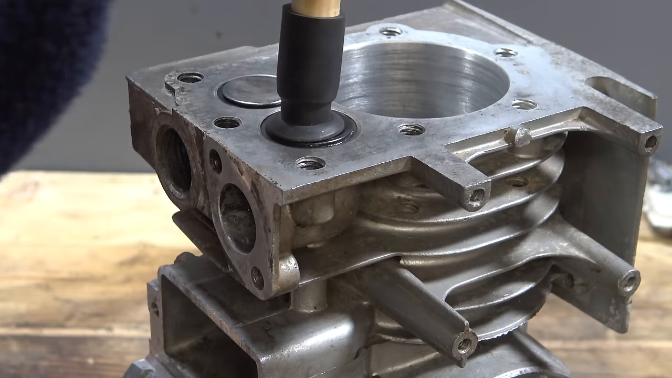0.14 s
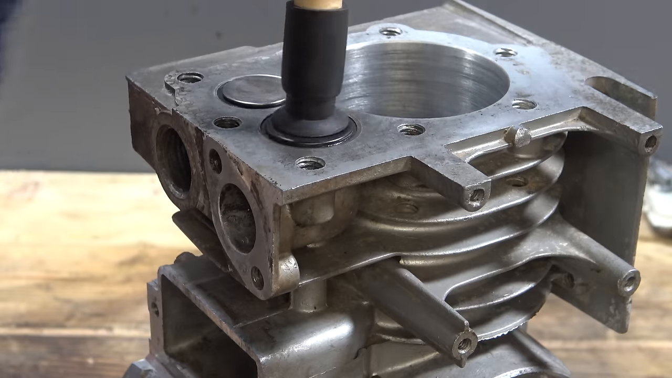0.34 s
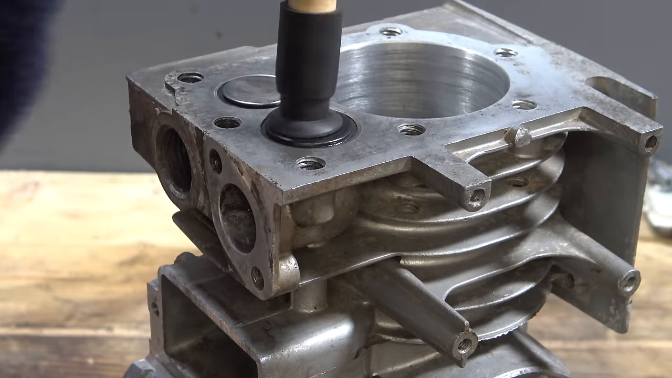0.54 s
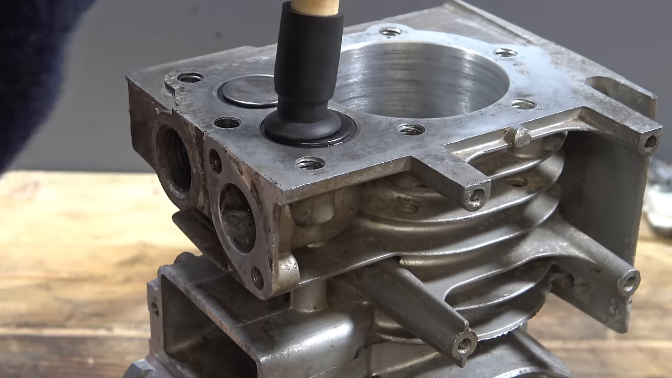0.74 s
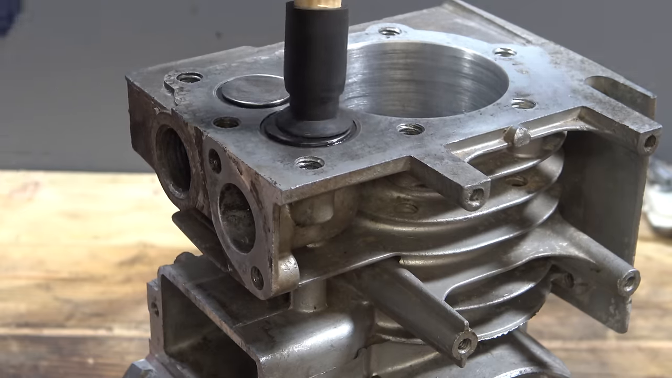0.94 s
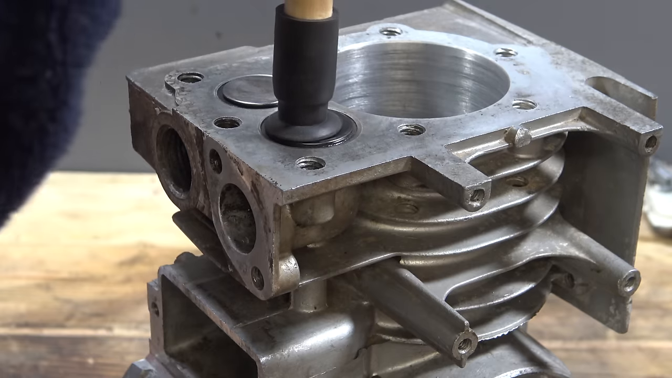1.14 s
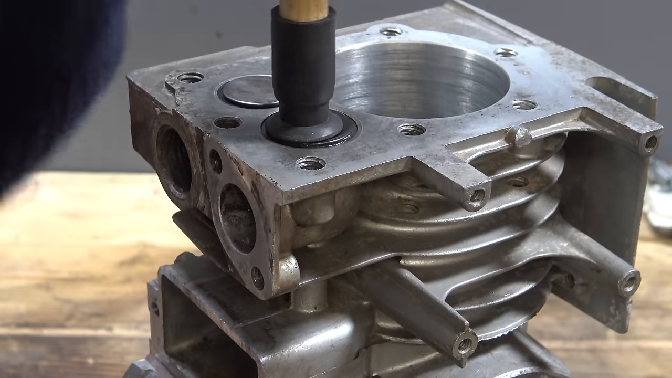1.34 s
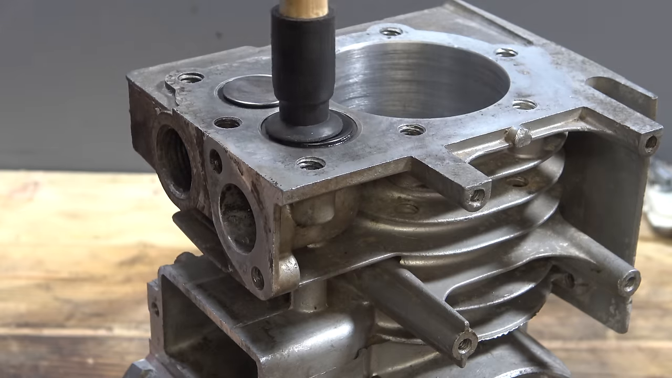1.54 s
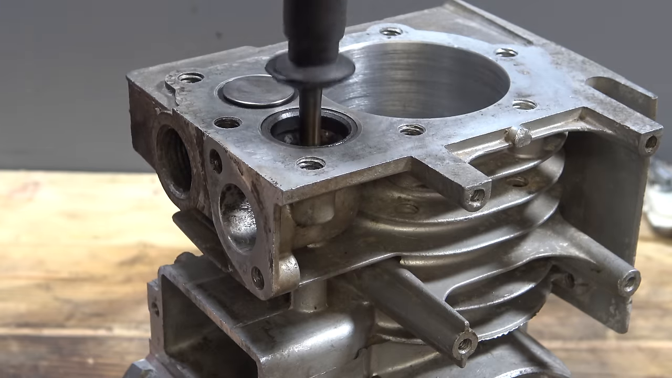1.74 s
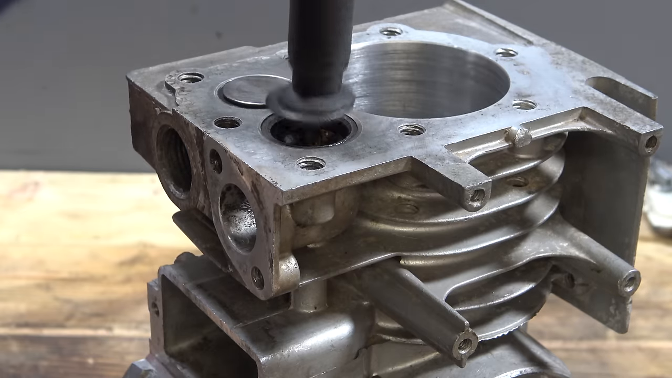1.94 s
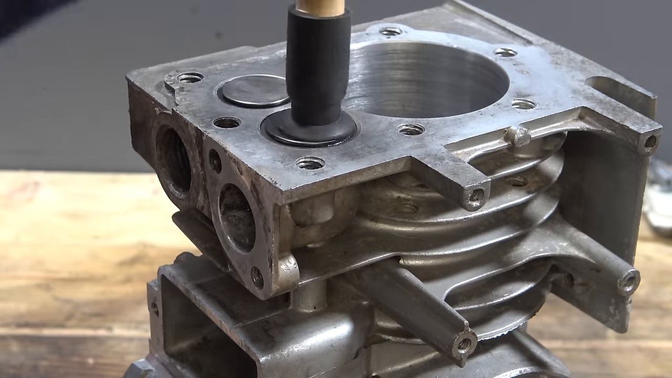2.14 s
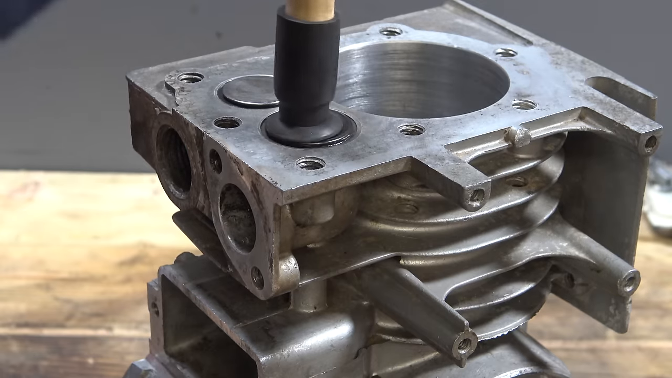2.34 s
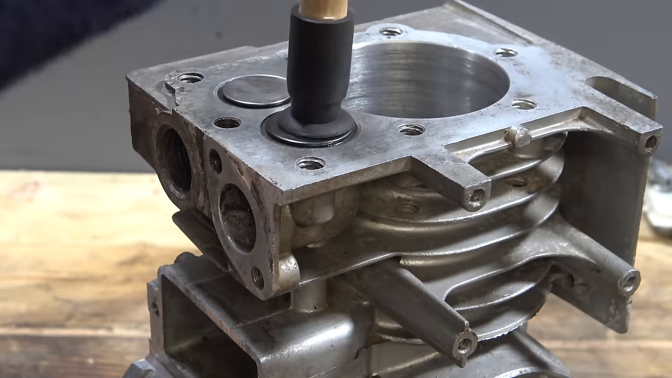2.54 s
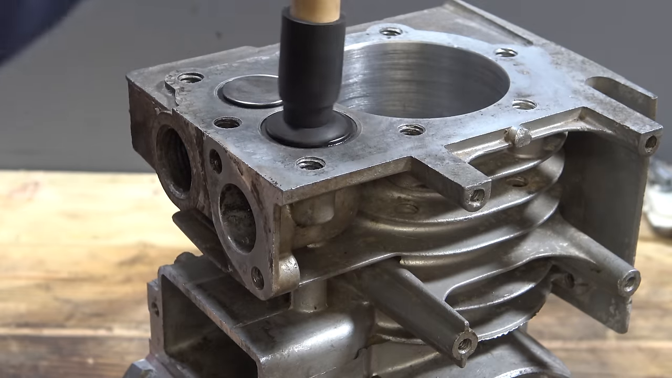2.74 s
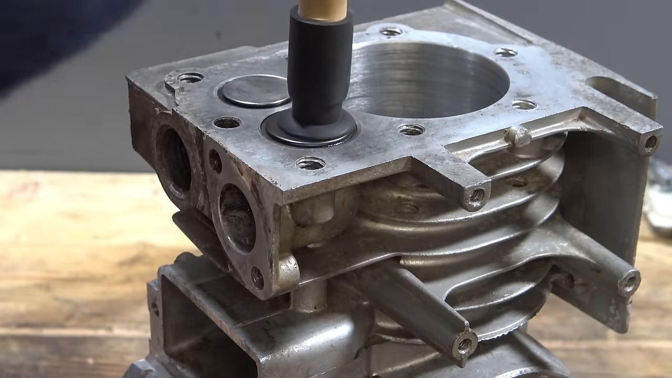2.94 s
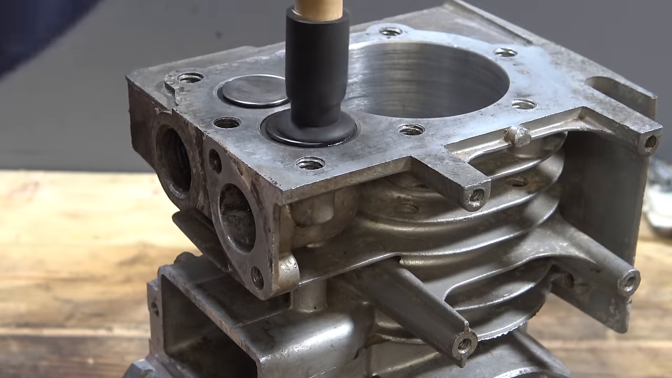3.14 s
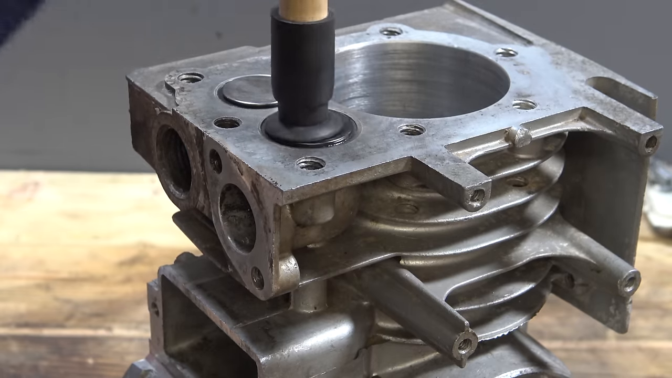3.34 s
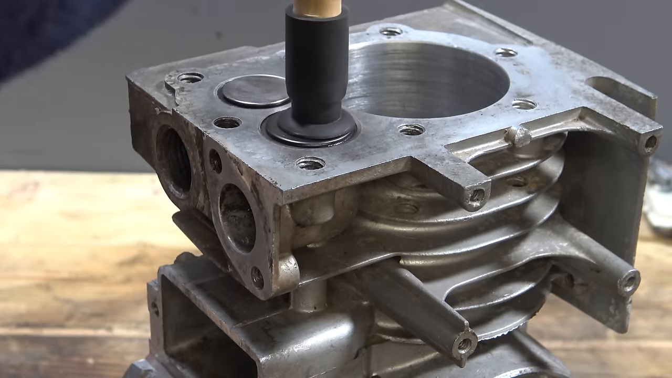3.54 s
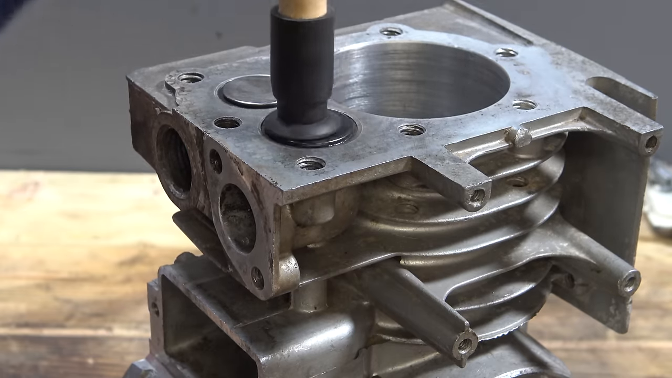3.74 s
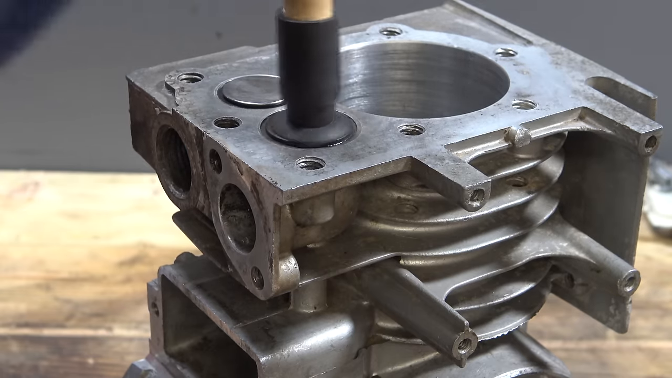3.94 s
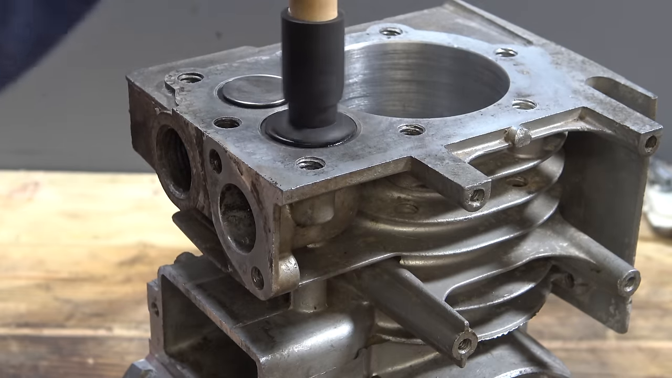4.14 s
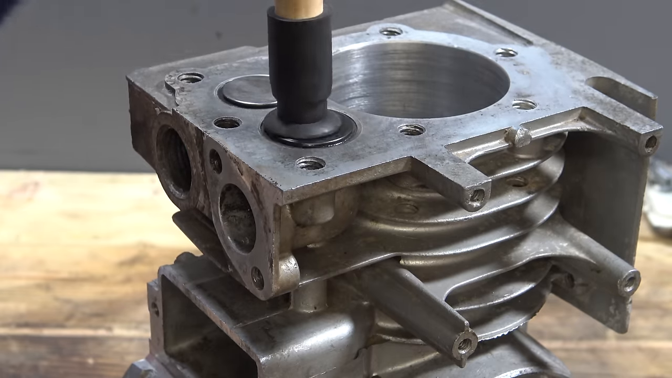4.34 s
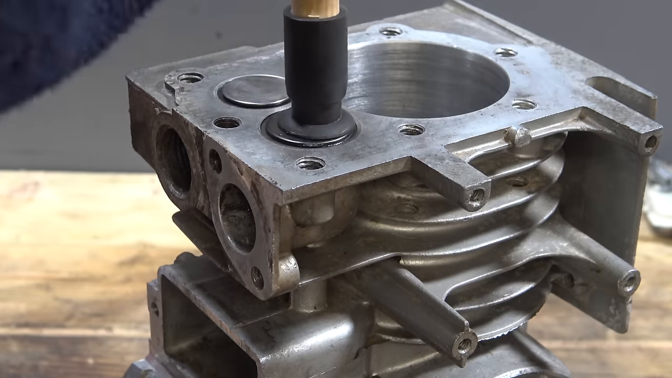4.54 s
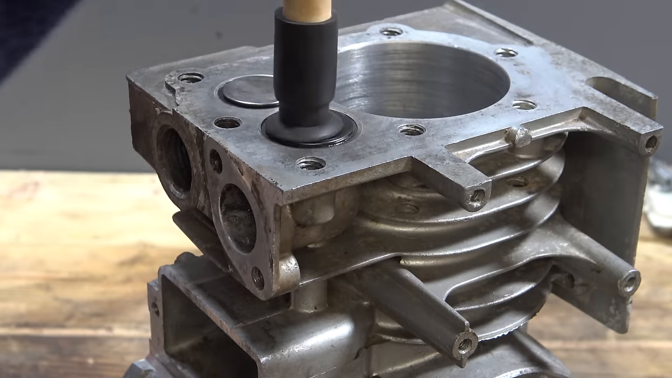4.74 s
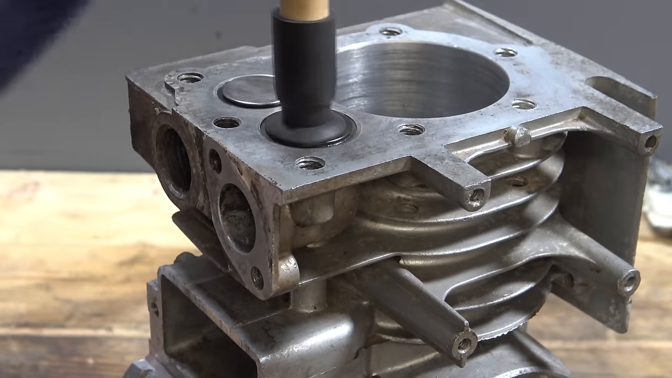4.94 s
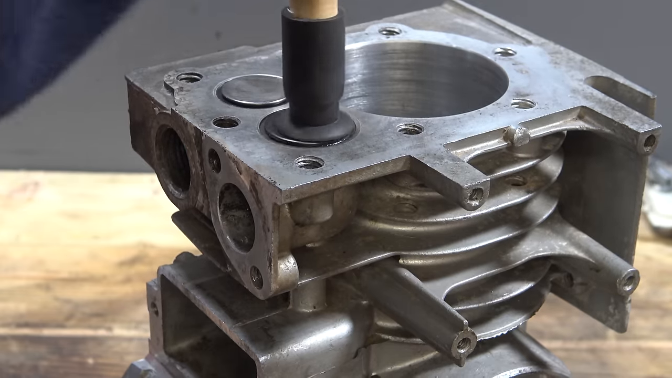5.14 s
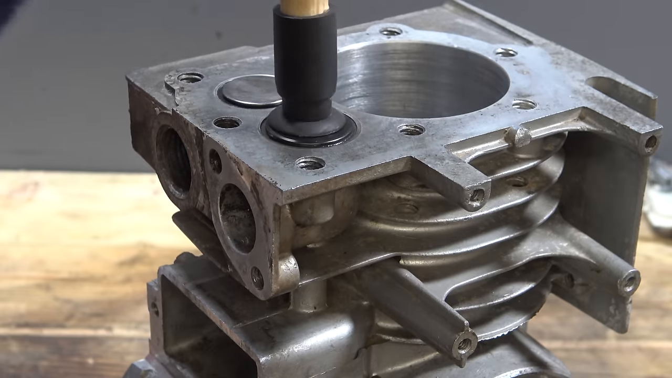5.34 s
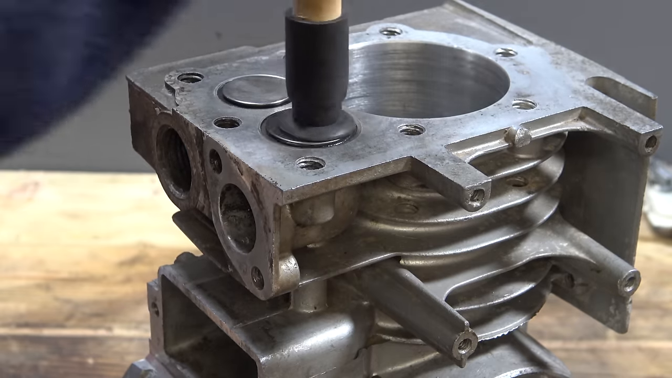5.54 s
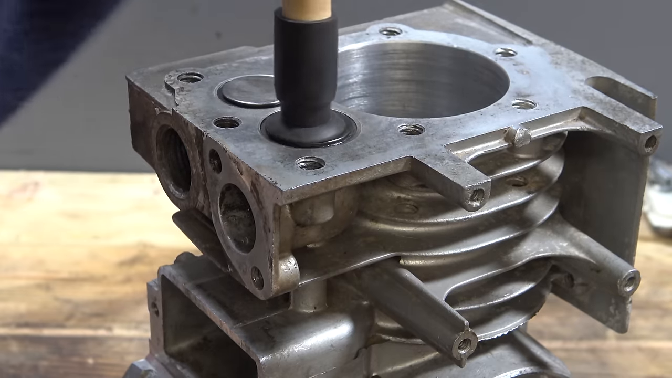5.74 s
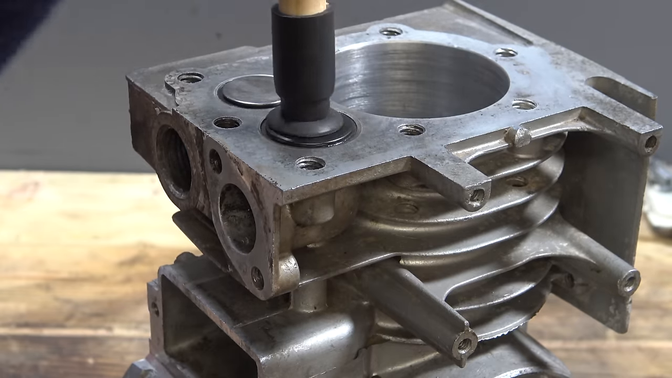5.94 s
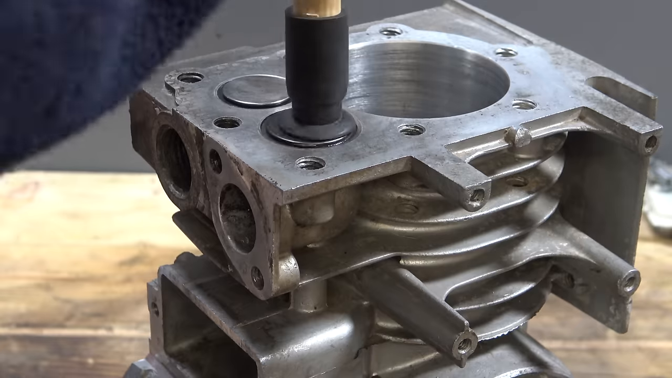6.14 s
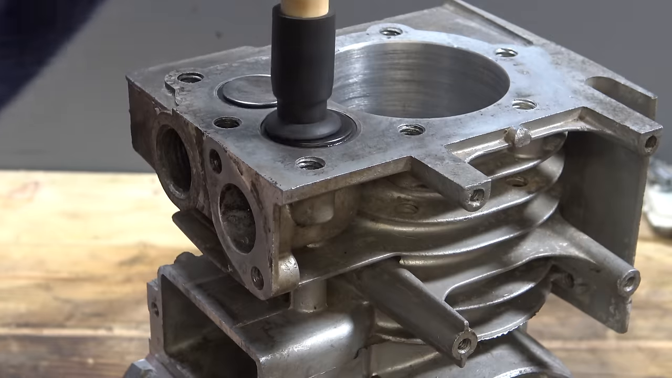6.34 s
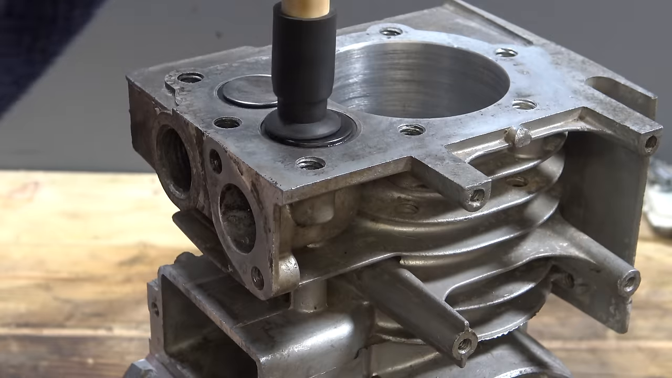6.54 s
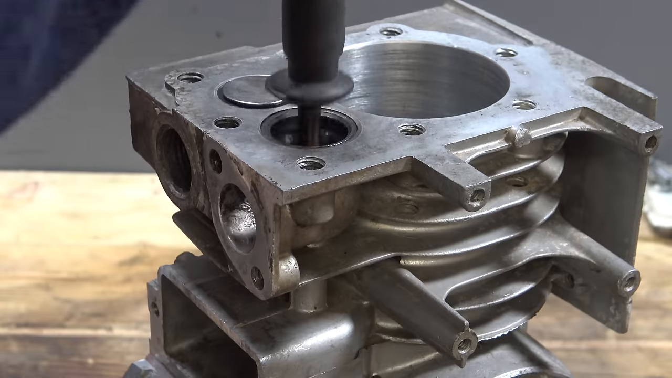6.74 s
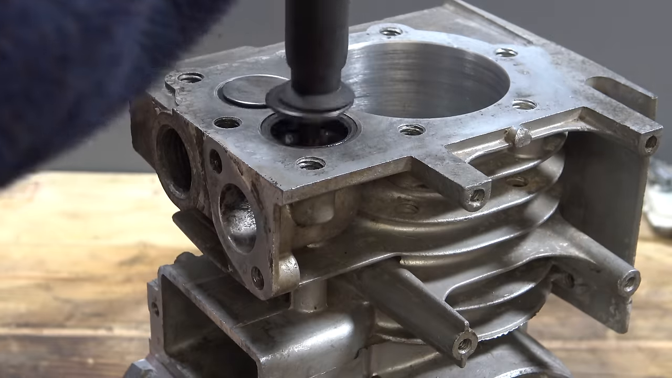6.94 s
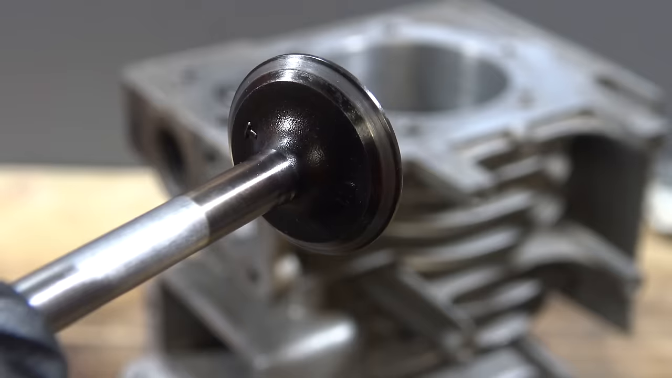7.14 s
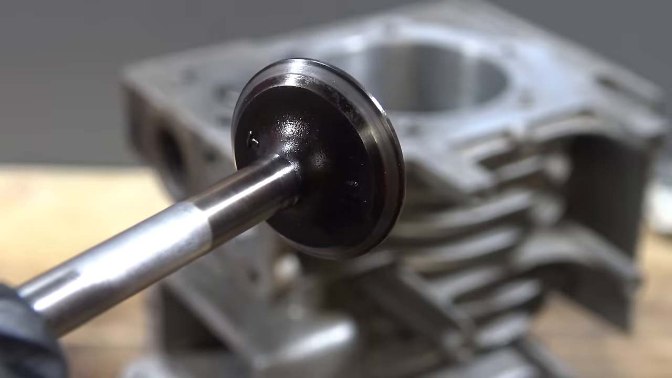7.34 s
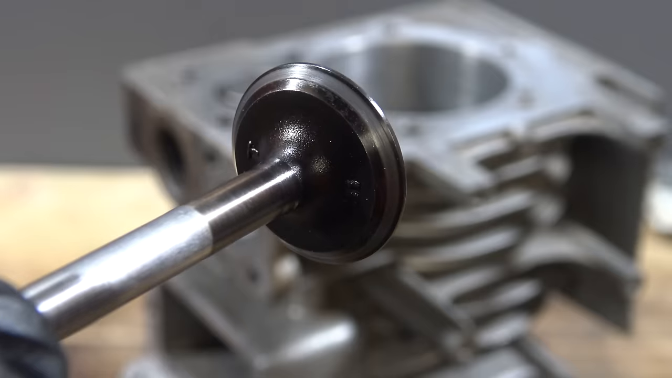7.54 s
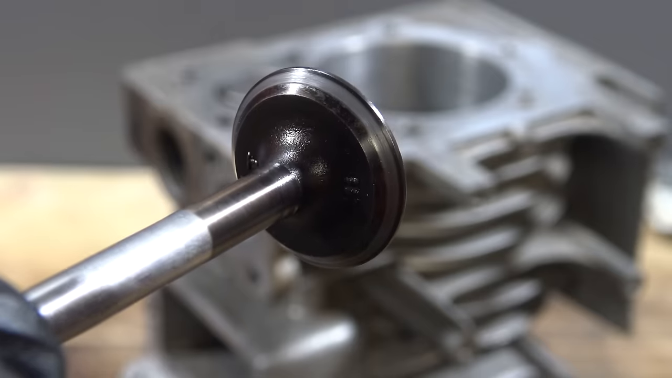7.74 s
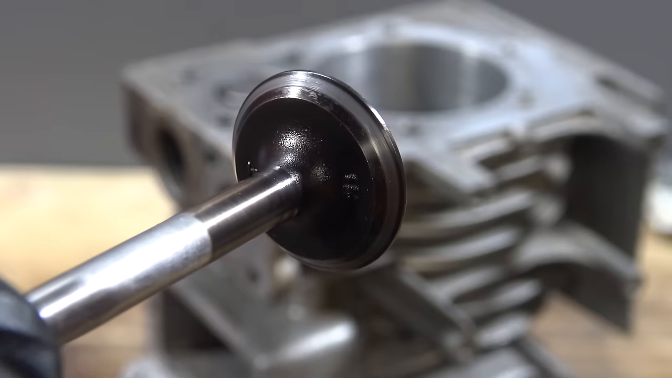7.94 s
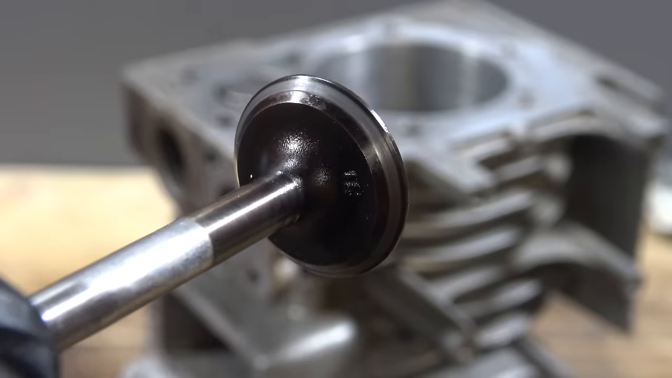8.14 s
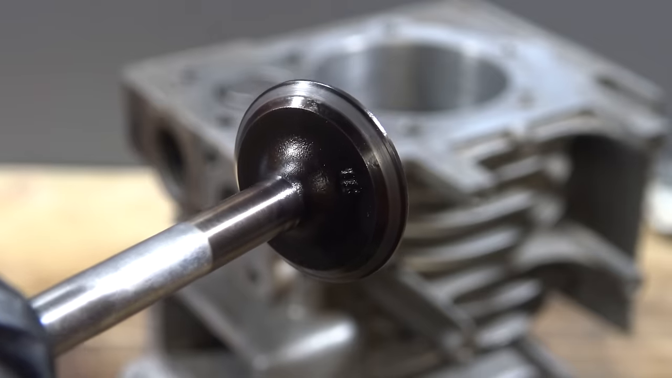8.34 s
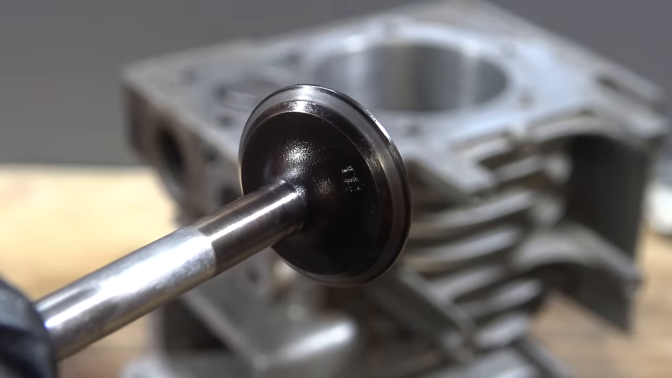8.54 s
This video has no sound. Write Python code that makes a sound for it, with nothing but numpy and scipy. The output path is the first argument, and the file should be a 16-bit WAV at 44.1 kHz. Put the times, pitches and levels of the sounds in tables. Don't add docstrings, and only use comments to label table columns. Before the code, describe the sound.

Close up in a small workshop, an engine valve is twirled on its seat in rapid, gritty strokes, about four a second, ringing bright cast metal. It lifts with a light sliding scrape, drops with a sharp knock and bounce, then grinds louder and coarser, gradually getting finer. After a second lift the work cuts off dead, leaving soft room air, a faint far fan, sparrow chirps and a small low rumble at the end.

```python
import sys
import numpy as np
from scipy import signal
from scipy.fft import rfft, irfft, next_fast_len
from scipy.io import wavfile
from scipy.ndimage import uniform_filter1d

SR = 44100
rng = np.random.default_rng(int(sys.argv[2]) if len(sys.argv) > 2 else 0)


def wav_record(signal):
    frames = np.transpose(np.atleast_2d(signal))
    bounded = np.clip(frames, -1, 1)
    quanta = np.round(bounded * 32767).astype(np.int16)
    wavfile.write(sys.argv[1], SR, quanta)


def field_ratio(decibels):
    return 10 ** (np.asarray(decibels, dtype=float) / 20)


N = 378368
T = np.arange(N) / SR


def level(x, db):
    return x * field_ratio(db) / np.sqrt(np.mean(x ** 2))


def ring(x, hz, width):
    return signal.lfilter(*signal.iirpeak(hz, hz / width, fs=SR), x)


def band_filter(x, hz, kind):
    return signal.sosfilt(signal.butter(2, hz, kind, fs=SR, output="sos"), x)


def colour(x, spectrum):
    hz, db = np.transpose(spectrum)
    size = next_fast_len(x.shape[-1])
    f = np.fft.rfftfreq(size, 1 / SR) + 1
    gain = field_ratio(np.interp(np.log(f), np.log(hz), db))
    return irfft(rfft(x, size) * gain, size)[..., :x.shape[-1]]


def walk(rate):
    k = int(SR / rate)
    steps = np.repeat(rng.standard_normal(N // k + 1), k)
    return 1.47 * uniform_filter1d(steps, k)[:N]


def tail(t60, spread):
    t = np.arange(SR // 2) / SR
    mid, side = rng.standard_normal((2, len(t))) * np.exp(-np.log(1000) * t / t60)
    return np.array([mid + spread * side, mid - spread * side]) / np.sqrt(np.sum(mid ** 2))


def through(x, response):
    return signal.fftconvolve(x[None], response, axes=1)[:, :N]


def grit(scatter_db, patchy_db):
    luck = np.minimum(rng.exponential(size=N), 5)
    return level(rng.standard_normal(N) * field_ratio(scatter_db * luck + patchy_db * walk(70)), 0)


def modes(force, blows, table, wander_db, spread):
    mid, side = np.zeros(N), np.zeros(N)
    knots = np.arange(0, N / SR + 1, .12)
    sense = rng.choice([-1, 1], N + len(table))
    for k, (hz, width, db) in enumerate(table):
        fed = np.interp(T, knots, field_ratio(db + wander_db * rng.standard_normal(len(knots))))
        push = force * sense[k:k + N] + (-1) ** k * blows
        tone = ring(fed * push, hz, width)
        mid += tone
        side += spread * rng.standard_normal() * tone
    return np.array([mid + side, mid - side])


# pitch_hz [Hz], width_hz [Hz], level_db [dB]
WALLS = [(1130, 60, -24), (1270, 40, -21), (1400, 70, -24), (1570, 50, -17), (1700, 47, -8),
         (1900, 80, -16), (2020, 30, -15), (2085, 30, -12), (2190, 45, -11), (2330, 38, -12)]
# pitch_hz [Hz], width_hz [Hz], level_db [dB]
BLOCK = [(2577, 22, -5), (2600, 22, -6), (2850, 40, -17), (3020, 200, -18), (3232, 20, -3), (3258, 20, -1),
         (3803, 22, -7), (3880, 25, -12), (4080, 38, -11), (4360, 22, -9), (4475, 20, -2), (4510, 20, -8),
         (4622, 17, -6), (4768, 26, -7), (4860, 25, -11), (5038, 20, -12), (5257, 13, -12), (5511, 31, -7),
         (5680, 38, -7), (5977, 14, -16), (6135, 22, -13), (6442, 30, -11), (6548, 35, -8), (6601, 25, -9)]
# pitch_hz [Hz], width_hz [Hz], level_db [dB]
FINS = [(6830, 19, -3), (7140, 170, -1), (7550, 25, -3), (7780, 140, -4), (8100, 50, -10), (8560, 37, -2),
        (8860, 34, -1), (9190, 160, 0), (9660, 91, -5), (9800, 15, -11), (10100, 52, -3), (10500, 28, -10),
        (10900, 77, -3), (11100, 45, -9), (11700, 26, -7), (12100, 75, -3), (12300, 23, -9),
        (12700, 59, -14), (12800, 29, -16), (13200, 43, -12), (13500, 40, -13), (13900, 75, -14),
        (14100, 29, -19), (14400, 93, -12), (14700, 21, -16), (14900, 36, -16), (15500, 47, -19)]
# pitch_hz [Hz], level_db [dB per Hz]
DENSE = [(700, -24.5), (1100, -13.5), (1500, -8.5), (1800, -2.5), (2300, 1), (3000, -22.5), (3600, -17),
         (4500, -11), (6000, -7.5), (7200, -7.5), (9000, -12), (12000, -14), (16000, -27)]
RING_T60_S = .06


def casting(low, rub, high, blows, dense_db):
    metal = modes(low, 2.5 * blows, WALLS, wander_db=1.5, spread=.05)
    metal += field_ratio(1.5) * modes(rub, blows, BLOCK, wander_db=2.2, spread=.07)
    metal += modes(high * field_ratio(-20), .03 * blows, FINS, wander_db=1.5, spread=.07)
    # force, band edges (Hz), stereo spread, level (dB)
    bands = [(low + 2.5 * blows, [700, 2400], .07, -13),
             (rub + blows, [2400, 7000], .1, -14),
             (high, [7000, 17000], .18, -18)]
    for force, edges_hz, spread, db in bands:
        part = band_filter(force, edges_hz, "band")
        wash = colour(tail(RING_T60_S, spread), DENSE)[:, :SR // 4]
        metal += field_ratio(dense_db + db) * through(part, wash)
    return band_filter(metal, 1100, "high")


COARSE_DB, FINE_DB, DENSE_DB = (10, -8), (-1, 4.5), (-9, 3.5)
BENCH_DB, PORT_DB = (-30.5, -44, -47), (-14, -40, -52)
STEM_COARSE_DB, STEM_FINE_DB, STEM_DENSE_DB, STEM_BENCH_DB, STEM_PORT_DB = 6.5, 3, -4.5, 4, -12
BENCH_FOLLOWS, PORT_FOLLOWS, REVERSAL_SHAKE, USUAL_DB = 0.423, 0.41, 0.84, -16
SLOW_HISS = 0.33


def lapping():
    effort, load, lifted, fresh, settling = contact()

    def blend(new_db, worn_db, stem_db):
        seat_db = worn_db + (new_db - worn_db) * fresh
        return (1 - lifted) * seat_db + lifted * stem_db

    coarse = blend(*COARSE_DB, load + STEM_COARSE_DB)
    fine = blend(*FINE_DB, STEM_FINE_DB)
    dense = blend(*DENSE_DB, STEM_DENSE_DB)
    blows, air = knocks()
    rub = grit(scatter_db=2.5, patchy_db=.8) * field_ratio(effort + 17.5)
    pace = uniform_filter1d(effort, SR // 7) - uniform_filter1d(effort, SR // 2)
    pace = np.clip(pace, -8, 6)
    low = rub * field_ratio(coarse - 0.5 * pace - 1.0)
    slack = (1 - lifted) * np.maximum(effort - USUAL_DB, -45)
    creep = SLOW_HISS * np.clip(slack + 8, -24, 0)
    high = rub * field_ratio(fine + 0.35 * pace - creep)
    metal = casting(low, rub, high, blows, dense)
    bench = blend(*BENCH_DB[1:], effort + load + STEM_BENCH_DB)
    bench += (BENCH_DB[0] - BENCH_DB[1]) * settling
    bench += BENCH_FOLLOWS * slack - REVERSAL_SHAKE * pace
    port = blend(*PORT_DB[1:], effort + STEM_PORT_DB)
    port += (PORT_DB[0] - PORT_DB[1]) * settling
    metal += air + boom(blows, bench, port + PORT_FOLLOWS * slack)
    return metal + field_ratio(-38.0) * through(metal.mean(0), tail(.3, spread=0.2))


# start_s [s], length_s [s],
# level_db [dB], sag_db [dB], rise_s [s]
TWIRLS = [(0, 0.2, -20.5, 0, 0.044), (0.242, 0.25, -22.5, 1, 0.069), (0.521, 0.2, -20.5, -3, 0.061),
          (0.765, 0.24, -22.5, 3.5, 0.078), (1.033, 0.23, -22, -1.5, 0.053),
          (2.128, 0.087, -26, 1, 0.0083), (2.175, 0.21, -14.5, 5, 0.045), (2.421, 0.18, -15, 0, .035),
                (2.67, 0.21, -16, 9.5, 0.074), (2.928, 0.16, -14, -2, 0.018),
                (3.127, 0.24, -14, 0.5, 0.067), (3.407, 0.18, -14, 3.5, 0.041),
                (3.618, 0.28, -15, -0.5, .03), (3.92, .2, -15, -0.5, 0.049), (4.142, 0.25, -16, 0, .04),
                (4.427, .2, -15, 4, 0.053), (4.659, .26, -16.5, 3, 0.042), (4.95, 0.19, -15.5, -1, 0.032),
                (5.175, 0.26, -16, 2, 0.049), (5.457, 0.22, -16, 0, 0.05), (5.709, .27, -17.5, 2.5, 0.037),
                (6.01, 0.23, -18, 1.5, 0.052), (6.263, 0.25, -19.5, 3, 0.054), (6.555, 0.12, -26, 3, 0.026)]
REST_DB = -70
LEAD_S, JOLT_S, JOLT_DB, JOLT_DB_PER_S = 0.0083, .013, -20, 500.5
SLOWING_S, SLOWING_DB_PER_S = 0.041, 329.5
CREEP_DB, CREEP_DB_PER_S = -14, 104
STICK_S, STICK_DB_PER_S = .14, 350


def twirls():
    force = np.full(N, field_ratio(REST_DB))
    for s, length, db, sag_db, rise_s in TWIRLS:
        span = slice(max(int((s - LEAD_S) * SR), 0), int((s + 1) * SR))
        age = T[span] - s + LEAD_S
        swell = np.clip(age / max(rise_s, .005), 0, 1)
        jolt = (age > JOLT_S) * field_ratio(JOLT_DB - JOLT_DB_PER_S * np.abs(age - JOLT_S))
        late = np.maximum(age - length + SLOWING_S, 0)
        slowing = field_ratio(-SLOWING_DB_PER_S * late)
        creeping = field_ratio(CREEP_DB - CREEP_DB_PER_S * late)
        sticking = field_ratio(-STICK_DB_PER_S * np.maximum(late - STICK_S, 0))
        stop = np.maximum(slowing, creeping) * sticking
        sag = sag_db * (.5 - np.clip(age / length, 0, 1))
        force[span] += (swell + jolt) * stop * field_ratio(db + sag)
    return force


# start_s [s], level_db [dB], side_load_db [dB]
LIFTS = [
    [(1.58, -58.5, -21), (1.638, -42, -30), (1.644, -30, -16), (1.828, -33, -33), (1.876, -44, -15),
     (1.924, -32.5, -18), (2.0, -32.5, -12.5), (2.078, -38, -40), (2.085, -28.5, -3)],
    [(6.67, -31, -10), (6.68, -35, 2), (6.696, -23, -13), (6.742, -35, -21), (6.808, -31.5, -18),
     (6.854, -44, -20), (7.012, -35, -8.5), (7.06, -39.5, -11), (7.12, -33.5, -14)],
]
RESEAT_S, WORKED_BEFORE_S = 2.1, 3.5
WEAR_S, SETTLE_S = 2.17, .35


def contact():
    seat, stem, load = twirls(), np.zeros(N), np.zeros(N)
    for lift in LIFTS:
        s, db, load_db = np.transpose(lift)
        during = (T > s[0]) & (T < s[-1] + .01)
        stem += during * field_ratio(np.interp(T, s, db) + 0.6 * walk(90))
        load += during * np.interp(T, s, load_db)
    worked = np.where(T < RESEAT_S, T + WORKED_BEFORE_S, T - RESEAT_S)
    effort, lifted = 20 * np.log10(seat + stem), stem / (seat + stem)
    return effort, load, lifted, np.exp(-worked / WEAR_S), np.exp(-worked / SETTLE_S)


# start_s [s], blow_db [dB], contact_ms [ms], thump_db [dB], crack_db [dB]
KNOCKS = [
    (1.643, -7.5, .15, -34, -20.5),
    (2.088, 10, .25, -36, -29.5),
    (2.134, 1, .25, -48, -27),
    (6.692, -12, .2, -38.5, -39),
    (6.698, -15, .15, -75, -40),
]


def knocks():
    force, air, t = np.zeros(N), np.zeros(N), np.arange(SR // 8) / SR
    for s, db, ms, thump_db, crack_db in KNOCKS:
        k = int(s * SR)
        noise = rng.standard_normal((3, len(t)))
        chatter = noise[0] * np.exp(-t / 0.0026)
        force[k:k + len(t)] += field_ratio(db) * uniform_filter1d(chatter, max(1, int(ms * SR / 1000)))
        thump = level(ring(noise[1], 130, 160), thump_db) * np.exp(-t / 0.021)
        crack = field_ratio(crack_db) * noise[2] * np.exp(-t / 0.00066)
        air[k:k + len(t)] += thump + crack
    return force, air


# pitch_hz [Hz], width_hz [Hz], level_db [dB]
BENCH = [(347.7, 66, -3), (406, 64, -3)]
# pitch_hz [Hz], width_hz [Hz], level_db [dB]
PORT = [(460, 65, -4.5), (652, 81, -0.5), (886, 150, -7.5), (1150, 140, -10)]
# peak_s [s], spread_s [s], bench_db [dB],
# port_db [dB]
DRAGS = [
    (1.795, 0.064, 7, 0.5),
    (1.969, 0.015, 3, 10),
    (6.968, 0.017, 10, 5),
    (7.052, .02, -4, 13),
]


def boom(blows, bench_db, port_db):
    shake = grit(scatter_db=1.5, patchy_db=2.0)
    for s, length, more_bench_db, more_port_db in DRAGS:
        drag = np.exp(-.5 * ((T - s) / length) ** 2)
        bench_db = bench_db + more_bench_db * drag
        port_db = port_db + more_port_db * drag
    both = modes(shake * field_ratio(bench_db + 21.5), 0.75 * blows, BENCH, wander_db=2.0, spread=.02)
    both += modes(shake * field_ratio(port_db + 17.0), 0.61 * blows, PORT, wander_db=-0.5, spread=.08)
    return ring(both, 600, 900) * field_ratio(np.array([[-.7], [.7]]))


# start_s [s], length_s [s], start_hz [Hz], end_hz [Hz], level_db [dB]
CHIRPS = [(1.55, 0.044, 4680, 3270, -63), (7.197, 0.063, 3800, 4690, -73),
          (7.256, 0.059, 3150, 3800, -66.5), (7.591, 0.063, 4840, 3490, -63.5),
          (7.644, 0.032, 3670, 3440, -63), (7.984, 0.054, 4420, 5000, -68.5),
          (8.039, 0.045, 4050, 3000, -67), (8.174, 0.068, 2900, 4310, -63), (8.222, .05, 4300, 4120, -70),
          (8.233, 0.047, 3800, 3050, -59.5), (8.376, 0.042, 5200, 4320, -65),
          (8.391, 0.044, 2400, 3520, -65), (8.419, 0.056, 3950, 3690, -56),
          (8.477, 0.042, 3700, 2900, -62.5)]
BURR_HZ = 239.6


def sparrows():
    song = np.zeros(N)
    for s, length, hz0, hz1, db in CHIRPS:
        u = np.clip((T - s) / length, 0, 1)
        hz = hz0 + (hz1 - hz0) * u + BURR_HZ * np.sin(2 * np.pi * 90 * T)
        song += field_ratio(db + 11.0) * np.sin(np.pi * u) * np.sin(2 * np.pi * np.cumsum(hz) / SR)
    walls = through(song, tail(.3, spread=0.09))
    yard = through(song, tail(0.98, spread=0.15))
    return 0.64 * song + 0.83 * walls + .3 * yard


# pitch_hz [Hz], level_db [dB per Hz]
AIR = [(15, -18), (25, 4.5), (45, 3), (75, 4.5), (120, -5.5), (250, -3), (500, -18.5), (1000, -13.5),
       (2000, -21), (3000, -22), (5000, -24), (10000, -27), (16000, -29)]
# pitch_hz [Hz], width_hz [Hz], level_db [dB]
FAN = [(880, 28, -68.5), (978, 40, -69)]
# start_s [s], level_db [dB]
SHIFT = [
    (8.49, -70.5),
    (8.53, -55),
    (8.58, -48),
]


def workshop():
    mid, side, drag = rng.standard_normal((3, N))
    side = side - uniform_filter1d(side, SR // 150)
    apart = 0.15 * side * np.array([[1], [-1]])
    air = level(colour(mid + apart, AIR), -56) * field_ratio(0.6 * walk(2.7))
    fan = sum(level(ring(rng.standard_normal(N), hz, width), db) for hz, width, db in FAN)
    scrape = ring(ring(drag, 1500, 900), 1500, 900)
    rumble = level(ring(drag, 130, 90), 0) + level(scrape, -8.0)
    return air + fan + rumble * field_ratio(np.interp(T, *np.transpose(SHIFT)))


CHANGE_S = 7.126


def scene():
    return lapping() * np.clip((CHANGE_S - T) / 0.0011, 0, 1) + sparrows() + workshop()


def low_pass(x):
    return signal.sosfilt(signal.butter(12, 16450, fs=SR, output="sos"), x)


# pitch_hz [Hz], level_db [dB]
TOP = [(15750, 0), (15830, -80)]


def record(dry):
    heard = dry * field_ratio(np.array([[-.25], [.25]]))
    soft = np.tanh(.8 * heard) / .8
    return low_pass(colour(soft, TOP))


dry = scene()
out = record(dry)
wav_record(out)
```